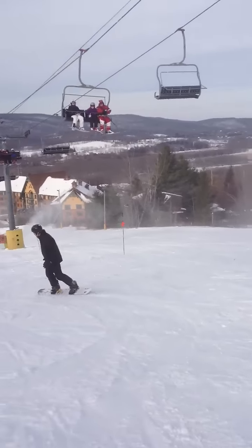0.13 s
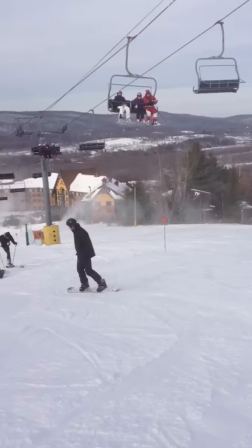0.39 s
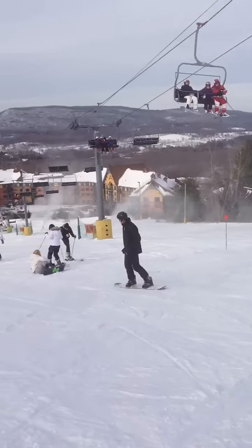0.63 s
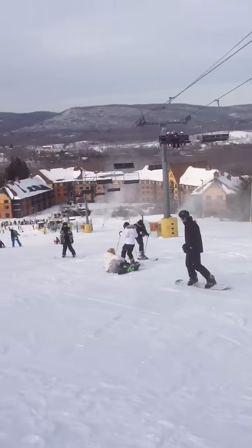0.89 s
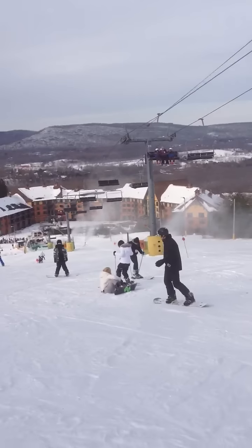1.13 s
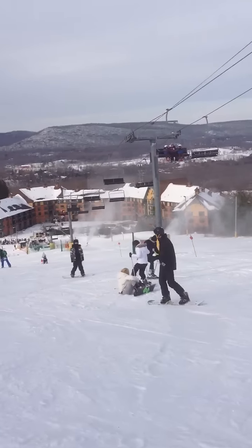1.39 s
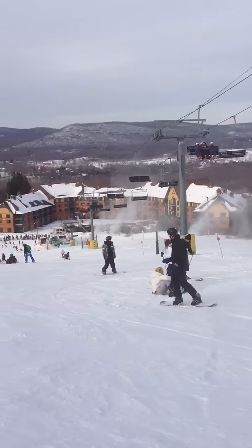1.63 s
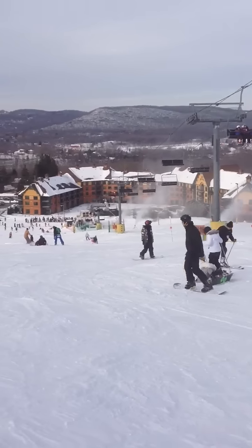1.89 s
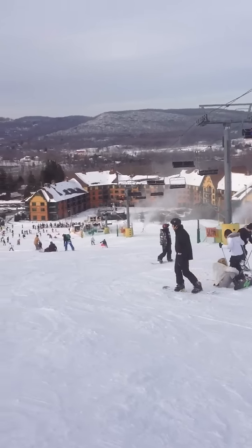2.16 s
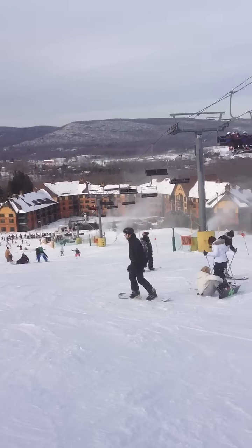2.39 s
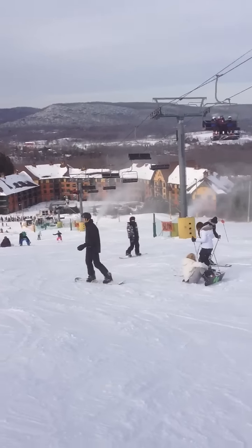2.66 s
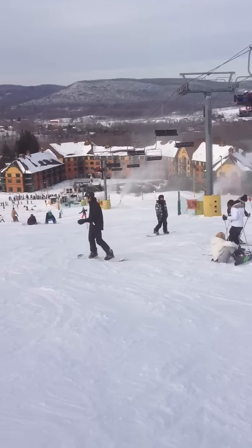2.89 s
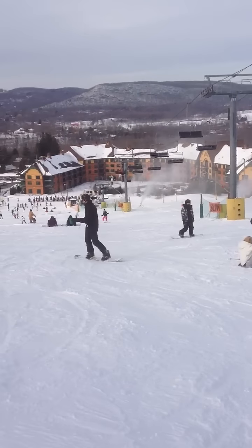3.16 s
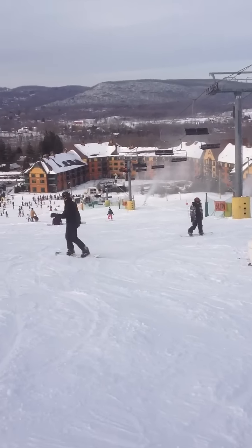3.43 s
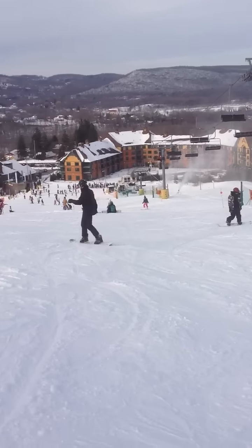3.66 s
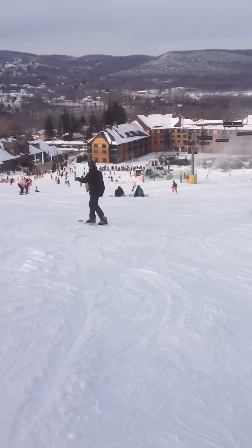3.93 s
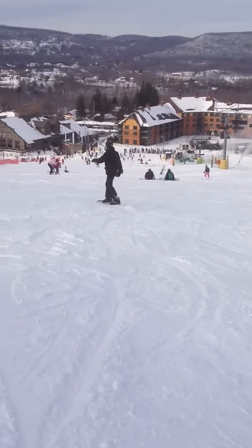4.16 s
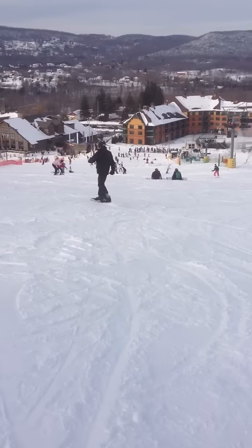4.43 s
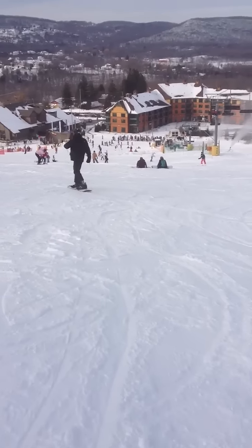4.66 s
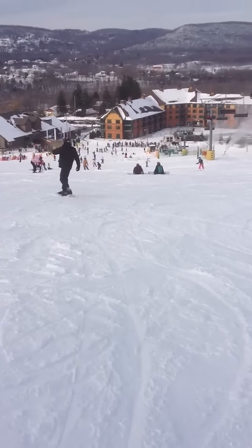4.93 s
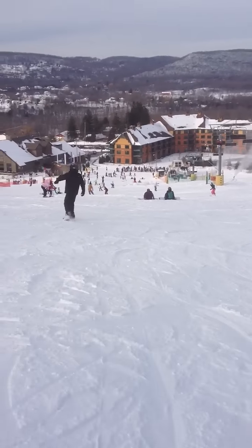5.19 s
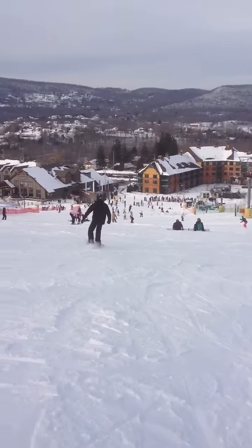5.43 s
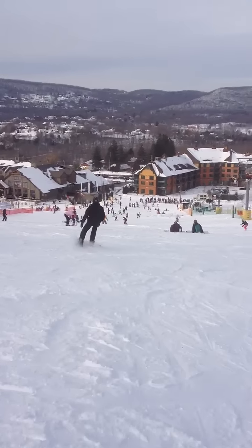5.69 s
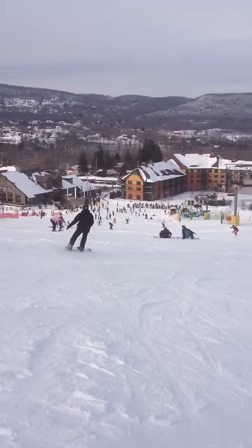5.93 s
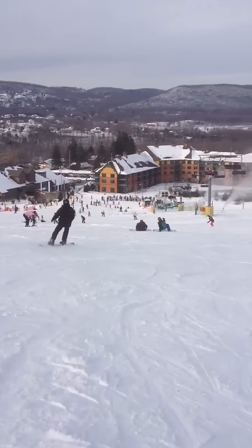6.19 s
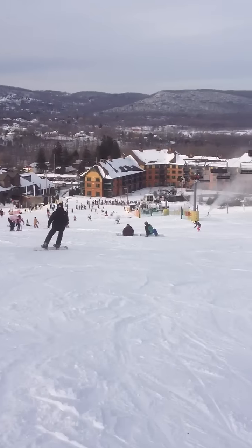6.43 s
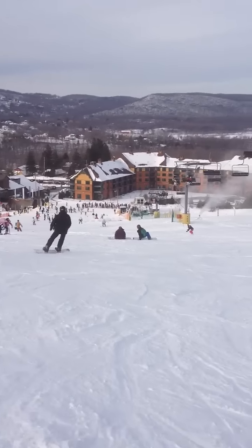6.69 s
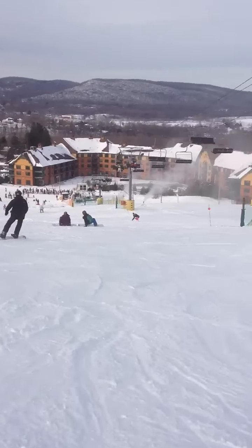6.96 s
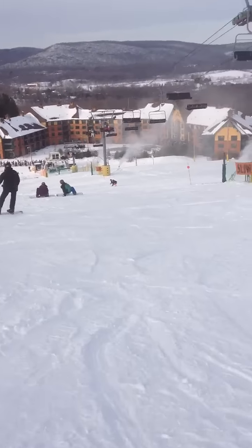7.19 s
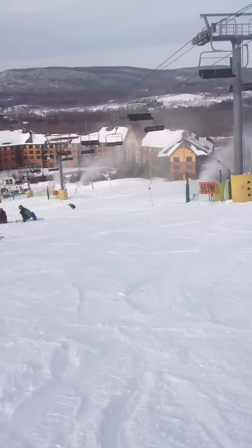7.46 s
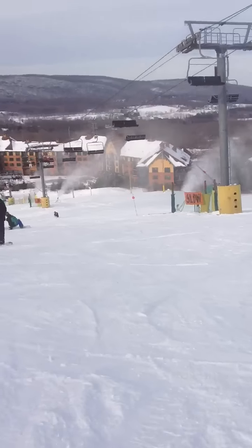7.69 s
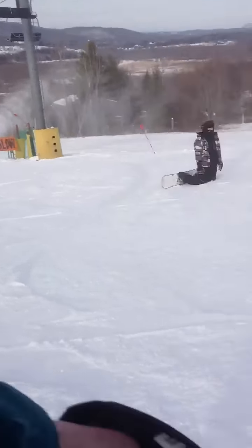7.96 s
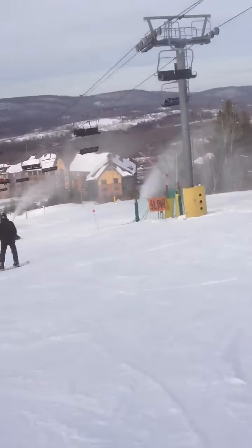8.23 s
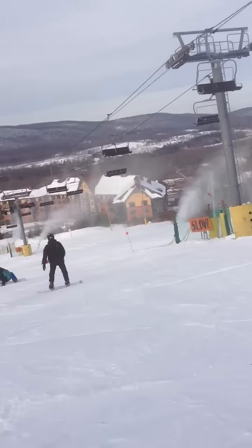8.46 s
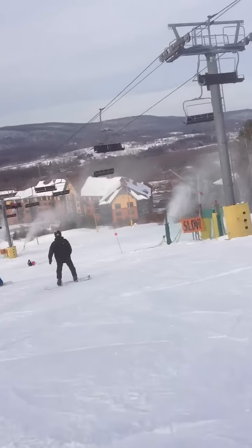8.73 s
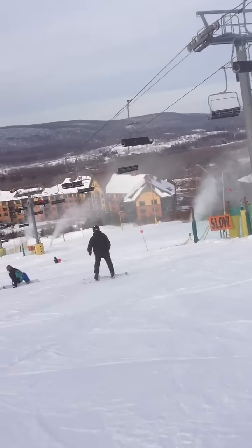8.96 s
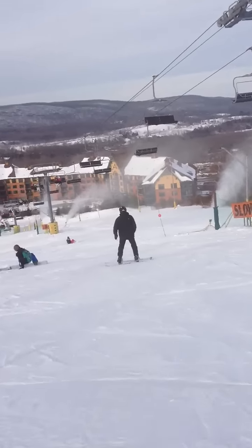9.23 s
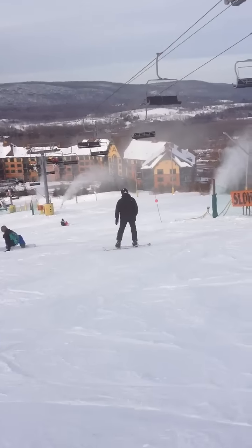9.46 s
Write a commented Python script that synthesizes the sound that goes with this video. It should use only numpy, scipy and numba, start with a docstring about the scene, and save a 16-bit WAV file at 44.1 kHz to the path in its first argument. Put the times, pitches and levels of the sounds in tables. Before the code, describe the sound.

Snowmaking guns hiss loudly and steadily like jets across an open ski slope, with light wind thumps and one hard buffeting gust near the end.

```python
"""Snow guns across a ski slope

Snow guns roar across the slope: jets of compressed air and water, made as coloured noise that flickers by band,
heard at a hand-held mono phone. Fingers, palm, case, arm, chest and shoulder throw short echoes, on paths some
2 to 45 cm longer than the direct one, that comb the hiss and slide as the phone pans. Wind buffets the
microphone port in low rumble and short thumps that swell and fade evenly, hardest when the phone is swung
round; then it rustles."""
import sys
import numpy as np
from scipy import signal
from scipy.fft import rfft, irfft, next_fast_len
from scipy.io import wavfile
from scipy.ndimage import uniform_filter1d, map_coordinates
from numba import njit

SR = 44100
rng = np.random.default_rng(int(sys.argv[2]) if len(sys.argv) > 2 else 0)


def attenuation_scalar(level_db):
    """Turn a level in dB into a linear amplitude multiplier (20 dB per decade)."""
    decades = np.asarray(level_db, float) / 20
    return 10 ** decades


def unload_audio(sound):
    """Save the sound as a 16-bit wav file, at the path given as the first command line argument."""
    columns = np.transpose(np.atleast_2d(sound))
    # keep every value between -1 and 1, then stretch to whole-number steps
    steps = np.round(np.clip(columns, -1, 1) * 32767)
    wavfile.write(sys.argv[1], SR, steps.astype(np.int16))


N = 423360  # samples, 9.6 s


def columns(table):
    """Every column of a curve after its time column, one value per sample."""
    s, *values = np.transpose(table)
    return [np.interp(np.arange(N) / SR, s, v) for v in values]


def walk(rate):
    """Random levels held 1 / rate s and slewed twice; spread near 1."""
    hold = int(SR / rate)
    steps = np.repeat(rng.standard_normal(N // hold + 1), hold)
    slewed = uniform_filter1d(uniform_filter1d(steps, hold), hold)
    return 1.19 * slewed[:N]


def bands(colour, centres_hz):
    """One coloured noise of rms 1, split into overlapping bands that sum back to it."""
    size = next_fast_len(N)
    octave = np.log2(np.maximum(np.arange(size // 2 + 1) * SR / size, 1))
    hz, db = np.transpose(colour)
    spectrum = rfft(rng.standard_normal(size)) * attenuation_scalar(np.interp(octave, np.log2(hz), db))
    spectrum /= np.std(irfft(spectrum, size))
    split = []
    for one in np.eye(len(centres_hz)):
        share = np.interp(octave, np.log2(centres_hz), one)
        split.append(irfft(spectrum * share, size)[:N])
    return split


def swells(rows, rise_db_s, fall_db_s):
    """Level in dB of events that rise, hold and fall on straight slopes; the loudest one counts."""
    t = np.arange(N) / SR
    levels = []
    for s, held_s, db in rows:
        before = np.maximum(s - t, 0)
        after = np.maximum(t - s - held_s, 0)
        levels.append(db - rise_db_s * before - fall_db_s * after)
    return np.max(levels, axis=0)


# colour of the jets' hiss: (frequency [Hz], relative density [dB per Hz])
JET_COLOUR = [(60, -66), (200, -25), (500, -23), (1100, -6), (1500, -2.5), (2200, -0.07), (3200, 0.0),
              (4600, -1), (5100, -6), (5600, -3.5), (6500, -2.5), (8700, -7.5), (9800, -10.5),
              (12500, -13.5), (15200, -20.5)]
# the hiss dulls as the phone pans away from the guns, brightens on return: (time [s], tilt [dB per octave])
JET_TILT = [(0.0, 1.74), (1.4, 2.5), (2.8, 1.5), (4.3, 1), (4.7, -0.06), (6.4, -0.5), (6.6, -0.15),
            (7.2, -0.44), (7.8, 0.8), (8.3, 0.4), (8.9, -1.8), (9.2, 0.6), (9.6, 0.7)]


def jets(flicker_db=0.93, surge_db=.5):
    """Mixing noise of the jets; gusty air on the way makes it surge as a whole and flicker band by band."""
    tilt_db = columns(JET_TILT)[0]
    centres_hz = 500 * 2 ** np.arange(0, 5.1, .5)
    surge = surge_db * walk(25)
    out = 0
    for hz, band in zip(centres_hz, bands(JET_COLOUR, centres_hz)):
        octaves = np.log2(max(hz, 1000) / 4000)  # the tilt pivots at 4 kHz
        out = out + band * attenuation_scalar(tilt_db * octaves + surge + flicker_db * walk(9))
    return out


# echoes off body and phone near the port; a share below 0 is inverted
# chest: (time [s], lag [microseconds], share [of direct sound])
CHEST_ECHO = [(0, 1212, .1), (.43, 1218, .17), (.66, 1085, .21), (.96, 1037, .03), (1.75, 911, .14),
              (2.65, 915, .07), (3.26, 683, .1), (3.6, 650, .1), (3.95, 540, .12), (4.76, 545, .12),
              (5.37, 473, .08), (5.66, 465, 0), (6.75, 1300, 0), (6.88, 1250, .14), (7.15, 1050, .14),
              (7.4, 1170, .13), (7.65, 1200, .13), (7.85, 950, .12), (8.02, 1250, .15), (8.1, 1250, 0),
              (9.6, 1250, 0)]
# shoulder: (time [s], lag [microseconds], share [of direct sound])
SHOULDER_ECHO = [(7.2, 790, 0), (7.35, 810, .1), (7.6, 830, .12), (7.7, 770, .18), (7.84, 660, .16),
                 (7.92, 720, .16), (8.02, 930, .15), (8.1, 950, 0)]
# forearm: (time [s], lag [microseconds], share [of direct sound])
FOREARM_ECHO = [(0.0, 387, 0.073), (1.3, 385, 0.05), (1.68, 441, -0.036), (2.49, 502, 0.0031),
                (3.94, 452, 0.083), (4.59, 445, 0.29), (5.3, 464, 0.11), (5.69, 422, 0.12),
                (6.3, 484, 0.16), (7.0, 453, 0.19), (7.07, 435, 0.23), (7.8, 386, 0.13), (8.1, 514, 0.01),
                (8.41, 409, 0.25), (8.99, 412.2, 0.1), (9.18, 291, -0.02), (9.6, 281, 0.05)]
# palm: (time [s], lag [microseconds], share [of direct sound])
PALM_ECHO = [(0.0, 464, -0.08), (1.38, 435, -0.183), (1.95, 401, -0.15), (2.26, 384, -0.043),
             (5.17, 450, -0.1), (5.65, 391, -0.13), (6.56, 380, -0.09), (6.83, 355, -0.117),
             (7.43, 300, -0.096), (7.75, 300, -0.456), (8.04, 259, -0.23), (8.28, 249.4, -0.31),
             (8.68, 213, -0.27), (9.24, 225, -0.5), (9.6, 226, -0.42)]
# phone case: (time [s], lag [microseconds], share [of direct sound])
CASE_ECHO = [(0.0, 242, 0.045), (2.2, 264, 0.012), (3.0, 232, 0.071), (4.65, 229, 0.19), (5.41, 227, 0.112),
             (6.38, 215, 0.15), (6.68, 224, 0.24), (7.24, 240, 0.057), (7.55, 167, -0.13),
             (7.58, 147, 0.17), (8.34, 149, 0.052), (8.5, 254, -0.16), (8.69, 292, 0.11),
             (9.06, 256, -0.089), (9.17, 532, 0.02), (9.25, 513, 0.1), (9.6, 494, 0.048)]
# fingers: (time [s], lag [microseconds], share [of direct sound])
FINGER_ECHO = [(0.0, 107.3, 0.16), (2.69, 80, 0.11), (3.12, 63, -0.077), (3.39, 82, 0.11),
               (3.82, 139, -0.057), (4.27, 303, 0.044), (4.68, 300, 0.09), (6.28, 282, 0.17),
               (6.44, 222, -0.058), (6.78, 159, 0.033), (7.54, 146, 0.15), (7.58, 71, 0.12),
               (8.23, 74, 0.18), (8.49, 71, -0.02), (8.66, 160, 0.14), (9.19, 118, -0.16), (9.35, 67, 0.12),
               (9.6, 71, 0.17)]


def held(sound, fold_share=.1, fold_us=1300, sway_us=120):
    """The direct sound plus delayed copies off hand and body: notches slide as the lags change."""
    echoes = (CHEST_ECHO, SHOULDER_ECHO, FOREARM_ECHO, PALM_ECHO, CASE_ECHO, FINGER_ECHO)
    paths = [columns(echo) for echo in echoes]
    # folds of the jacket add faint paths that sway with every small movement
    for spread in (.7, 1, 1.5):
        paths.append((fold_us * spread + sway_us * walk(2.5), fold_share * walk(3.03)))
    out = sound
    for lag_us, share in paths:
        place = np.arange(N) - lag_us * SR / 1e6  # in samples
        out = out + share * map_coordinates(sound, [place], order=3, mode="mirror")
    return out


@njit
def svf(x, hz, width_hz):
    """State-variable band-pass with a moving centre, gain 1 there."""
    y, b, l = np.empty(len(x)), 0., 0.
    for i in range(len(x)):
        g, k = np.tan(np.pi * hz[i] / SR), width_hz / hz[i]
        v = (b + g * (x[i] - l)) / (1 + g * (g + k))
        b, l, y[i] = 2 * v - b, l + 2 * g * v, k * v
    return y


# the hollow between palm and port swallows a narrow band; below 0 the band rings louder:
# (time [s], mean centre [Hz], share removed [0-1])
HOLLOW = [(1.3, 5000, .1), (2.1, 5250, .45), (2.7, 4900, .45), (4.0, 4900, .5), (4.5, 5080, .75),
          (5.8, 5080, .78), (6.85, 4900, .65), (6.9, 4800, 0), (6.95, 3300, 0), (7.05, 3150, .7),
          (7.55, 2900, .75), (7.75, 3300, 0), (7.84, 2800, 0), (7.89, 2700, -1.3), (7.98, 2300, -1.1),
          (8.03, 2200, 0)]


def cupped(sound, width_hz=300., wander_hz=75.):
    """Take away the band that the hollow traps and its overtone; both wander as the fingers flex."""
    hz, share = columns(HOLLOW)
    hz = hz + wander_hz * walk(5.3)
    for overtone in (1, 2):
        sound = sound - share * svf(sound, overtone * hz, overtone * width_hz)
    return sound


# sudden dips of the hiss, deepest under the strong gust: (time of deepest point [s], depth [dB])
DIPS = [(.8, 2), (1.2, 0.5), (1.76, 0.5), (2.33, 1), (3.15, 1), (3.38, 1.7), (4.0, 0.5), (4.78, 0.3),
        (5.32, 2), (5.64, 1.5), (6.26, 0.6), (6.65, 2.5), (6.82, 3), (7.19, 2), (7.55, 1), (7.84, 4.5),
        (8.04, 11.5), (8.19, 10), (8.27, 10), (8.45, 6.5), (8.6, 5), (8.86, 3), (9.12, 4)]


def dips(fall_s=0.029, recover_s=0.29):
    """Loss in dB: each dip falls fast and recovers slowly; the deepest one counts."""
    t = np.arange(N) / SR
    losses = []
    for s, db in DIPS:
        fall = np.clip((t - s) / fall_s + 1, 0, 1)
        recovery = np.exp(-np.maximum(t - s, 0) / recover_s)
        losses.append(db * fall * recovery)
    return np.max(losses, axis=0)


# slow swell of the hiss at the microphone, before the dips: (time [s], level [dB])
JET_LEVEL = [(0, -15), (.64, -14), (1.4, -15), (2.1, -15), (2.8, -14), (3.8, -13), (4.4, -15), (5.2, -14),
             (6.1, -14.5), (7.4, -13.5), (7.8, -14), (8.6, -16), (9.0, -15.5), (9.6, -15)]


def jet_level():
    """Gain of the hiss: the slow swell less the sudden dips."""
    return attenuation_scalar(columns(JET_LEVEL)[0] - dips())


# single eddies that thump the port; stretch scales the length:
# (time of peak [s], peak level of the swing [dB], pitch at the peak [Hz], length [ms])
THUMPS = [(0.045, -22, 181, 14), (0.295, -18, 171, 7.7), (0.371, -22, 253, 11), (0.406, -16.5, 223, 11),
          (0.466, -21, 188, 14), (0.518, -24, 270, 15), (0.824, -16.5, 312, 16), (1.278, -29, 257, 11),
          (1.488, -26.5, 203, 10), (1.959, -34, 255, 35), (2.063, -31, 201, 27), (3.32, -32, 260, 16),
          (4.933, -23.5, 244, 9.1), (5.083, -21, 228, 15), (5.123, -22, 275, 8.5), (5.167, -27, 258, 10),
          (5.653, -21.5, 226, 13), (5.702, -27, 313, 13), (7.084, -26.5, 205, 19), (7.619, -30, 240, 35),
          (8.023, -7.5, 346, 15), (8.037, -3, 248, 5.8), (8.043, -8, 215, 4.6), (8.066, -14, 256, 10),
          (8.112, -16.5, 260, 16), (8.127, -10.5, 283, 20), (8.163, -8, 300, 12.7), (8.204, -9.5, 360, 5.3),
          (8.219, -9.5, 297, 22), (8.246, -10.5, 300, 12), (8.268, -15, 247, 11), (8.302, -14.5, 235, 16),
          (8.327, -16, 229, 17), (8.356, -18, 230, 10), (8.41, -20, 290, 17)]


def thumps(rasp_db=-4, rasp_per_db=0.34, stretch=0.39):
    """Each eddy swings the diaphragm a few times; strong ones tear into a brighter rasp."""
    out = np.zeros(N)
    chance = rng.random((len(THUMPS), 2))
    rasp_colour = [(60, -30), (150, -4), (350, 0), (700, -3), (1500, -11), (3000, -28), (8000, -60)]
    rasp = sum(bands(rasp_colour, [100, 8000]))
    for (s, db, hz, length_ms), (turn, glide) in zip(THUMPS, chance):
        spread = stretch * length_ms / 1000
        reach = int(min(3 * spread, s) * SR)
        place = int(s * SR) + np.arange(-reach, reach)
        t = place / SR - s
        bend = 1 + 0.35 * (glide - .5) * t / spread  # pitch glides up or down
        swing = np.sin(2 * np.pi * (turn + hz * t * bend))
        tear = attenuation_scalar(rasp_db + rasp_per_db * db) * rasp[place]
        out[place] += attenuation_scalar(db) * np.exp(-(t / spread) ** 2) * (swing + tear)
    return out


# colour of the wind at the port: (frequency [Hz], relative density [dB per Hz])
WIND_COLOUR = [(30, -48), (60, -28), (140, -2), (250, -2.5), (450, -12.5), (900, -16), (2500, -44),
               (6000, -70)]
# steady breeze over the port: (time [s], rumble level [dB])
BREEZE = [(0, -39), (.9, -39), (1.6, -41.5), (2.2, -41.5), (2.35, -49), (3.4, -52.5), (4.4, -49),
          (4.6, -47), (7.0, -46), (7.95, -44), (8.4, -32.5), (9.08, -35), (9.13, -36), (9.6, -46)]
# gusts over the breeze: (start of hold [s], held [s], rumble level [dB])
GUSTS = [(0, 0.044, -31), (.36, 0.16, -32), (.81, .02, -31.5), (1.93, 0.13, -36.5), (3.29, 0.035, -45.5),
         (3.85, 0.045, -43), (5.06, 0.067, -35.5), (5.65, 0.087, -37.5), (7.06, 0.17, -42.5),
         (7.6, .08, -40), (8.02, 0.032, -31), (8.19, 0.12, -23.5)]


def rumble(patchy_db=3.0, own_db=2.0, bright_per_db=-0.08):
    """Turbulence at the port comes in lumps of a few hundredths of a second; its colour shifts with level."""
    gusts_db = swells(GUSTS, rise_db_s=450, fall_db_s=128)
    rumble_db = np.maximum(columns(BREEZE)[0], gusts_db)
    centres_hz = 62.5 * 2 ** np.arange(6.)
    lumps = patchy_db * walk(35)
    out = 0
    for hz, band in zip(centres_hz, bands(WIND_COLOUR, centres_hz)):
        octaves = max(np.log2(hz / 250), 0)
        # above 250 Hz, louder wind is weighted down and weaker wind up, about -26 dB
        colour_db = bright_per_db * (rumble_db + 26) * octaves
        out = out + band * attenuation_scalar(colour_db + own_db * walk(23))
    return out * attenuation_scalar(lumps + rumble_db)


# brighter rustles as the phone swings back: (start of hold [s], held [s], level [dB])
RUSTLES = [(8.73, 0.054, -26.5), (8.84, 0.022, -31), (8.96, 0.11, -25.5)]


def rustle(patchy_db=1.5):
    """A soft, grainy brushing in the low middle range, made of band-limited noise."""
    colour = [(150, -36), (220, 2.5), (450, 0), (720, -2), (1000, -11), (2500, -40)]
    brush = sum(bands(colour, [150, 2500]))
    level_db = swells(RUSTLES, rise_db_s=250, fall_db_s=600)
    return brush * attenuation_scalar(level_db + patchy_db * walk(50))


def scene():
    """Hiss and wind reach one microphone, copied to both channels."""
    hiss = cupped(held(jets())) * jet_level()
    return np.tile(hiss + thumps() + rumble() + rustle(), (2, 1))


def roll_off(x):
    """The treble ends steeply here."""
    return signal.sosfilt(signal.butter(12, 16400, fs=SR, output="sos"), x)


def record(dry):
    """The phone rounds the loudest peaks, cuts the rumble and cuts the top."""
    rounded = np.tanh(0.82 * dry) / 0.79
    low_cut = signal.butter(4, 62, "high", fs=SR, output="sos")
    top_cut = signal.ellip(10, .2, 90, 15300, fs=SR, output="sos")
    mix = signal.sosfilt(top_cut, signal.sosfilt(low_cut, rounded))
    return roll_off(mix)


dry = scene()
out = record(dry)
unload_audio(out)
```